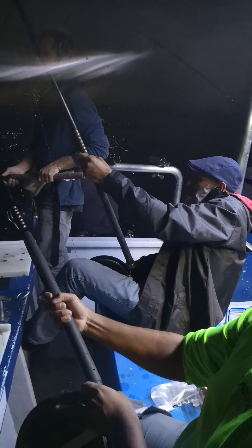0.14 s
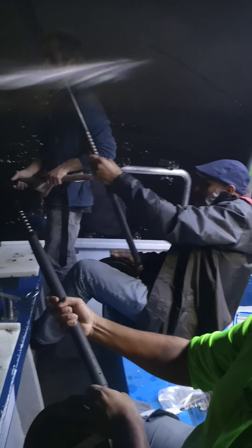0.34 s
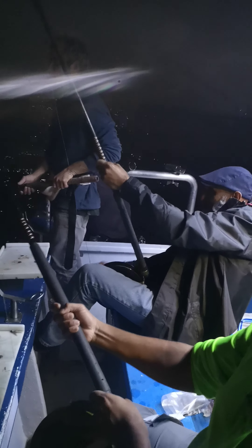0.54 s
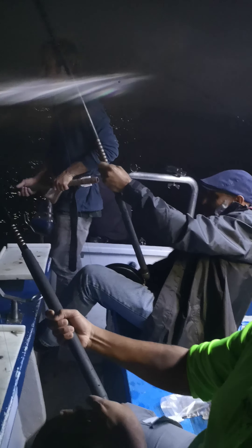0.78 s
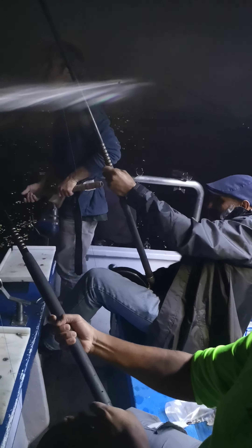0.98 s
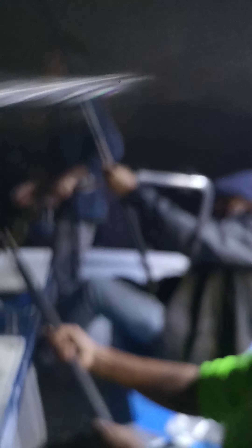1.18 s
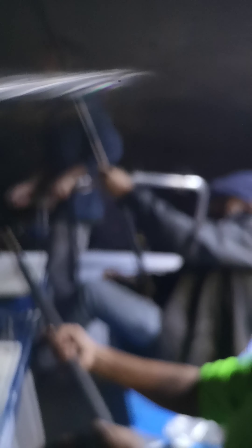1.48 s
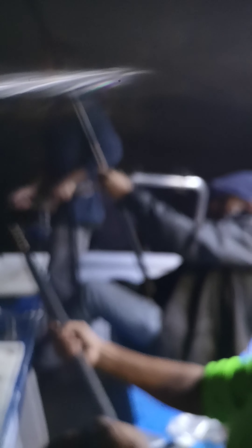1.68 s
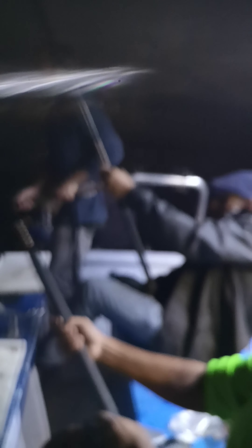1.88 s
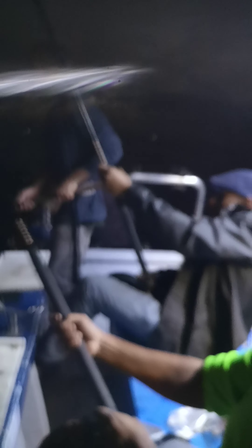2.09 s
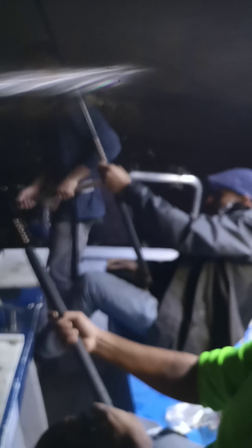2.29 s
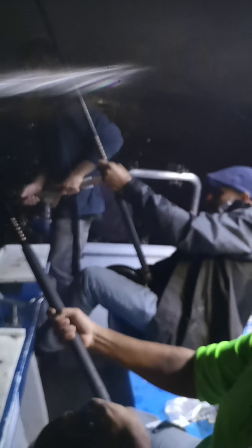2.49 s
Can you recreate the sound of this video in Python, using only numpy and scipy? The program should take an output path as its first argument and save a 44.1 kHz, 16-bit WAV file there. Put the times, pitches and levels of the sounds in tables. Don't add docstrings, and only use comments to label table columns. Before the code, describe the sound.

Wind buffeting a bare microphone in deep uneven thumps on a boat deck, with sharp gear clicks

```python
import sys
import numpy as np
from scipy import signal
from scipy.fft import rfft, irfft, next_fast_len
from scipy.io import wavfile
from scipy.ndimage import uniform_filter1d, minimum_filter1d

SR = 44100
rng = np.random.default_rng(int(sys.argv[2]) if len(sys.argv) > 2 else 0)


def magnitude_from_level(level_db):
    exponent = np.asarray(level_db, float) / 20
    return 10 ** exponent


def inscribe(sig):
    pcm = np.round(np.clip(np.atleast_2d(sig).T, -1, 1) * 32767)
    wavfile.write(sys.argv[1], SR, pcm.astype(np.int16))


N = 116865

# start [t/s], length [t/s], level [level/dB], air speed [scale on eddy pitch]
GUSTS = [(-.03, 0.099, -37.5, 1.33), (.08, 0.076, -36.5, 1.14), (.15, 0.23, -26, 1.146),
         (.31, 0.19, -24, 0.97), (0.378, 0.076, -27, 3.15), (.43, 0.16, -28, 1.16),
         (0.535, 0.234, -29.5, 0.85), (.72, 0.29, -30.5, 0.94), (.87, 0.22, -28, 1.24),
         (.95, 0.15, -24, 1.14), (1.04, 0.13, -26.5, 1.12), (1.185, 0.082, -30, 1.02),
         (1.26, 0.078, -37, 1.19), (1.35, 0.087, -29.5, 1.24), (1.485, 0.052, -37.5, 1.33),
         (1.6, 0.13, -27, 1.17), (1.65, 0.072, -28.5, 1.88), (1.69, 0.08, -33, 1.04),
         (1.755, 0.12, -44, 1.2), (1.876, 0.047, -25, 1.9), (1.922, 0.035, -27.5, 1.2),
         (1.957, 0.15, -45, 2.4), (2.08, 0.098, -38, 0.91), (2.17, 0.33, -50.5, 0.88),
         (2.4, 0.45, -53.5, 1.9), (2.566, 0.15, -34, 0.93), (0.47, 0.064, -32.5, 2.8),
         (0.54, .04, -34, 3.3), (.62, 0.036, -45, 2.9), (.73, 0.031, -41, 2.7), (.84, .06, -43.5, 2.8),
         (1.04, 0.04, -33.5, 2.56), (2.03, 0.049, -42.5, 1.56), (2.2, 0.17, -53.5, 2.35),
         (2.57, 0.055, -46, 2.6)]
# pitch [f/Hz], gain [level/dB]
EDDY_SPECTRUM = [(20, -16), (50, -5.5), (95, 0.5), (150, 1), (240, -11), (400, -23.5), (650, -47.5),
                 (2500, -130)]
# pitch [f/Hz], correlation [0 to 1]
PORT_LIKENESS = [(40, 0.82), (100, 1), (200, 0.91), (400, 0.84)]
PORT_LAG_S, PORT_TILT_DB = .0008, .6
GUST_RISE, GUST_FALL = .35, .4
EDDIES_PER_S, EDDY_SPREAD_DB = 450, 3
EDDY_TOP_HZ, WIND_EDGE_HZ = 280, 760
CREST_POWER = 1.8
GUST_TRIM_DB = -2.5

# time [t/s], level [level/dB]
RUMBLE_LEVEL = [(0.0, -40), (0.5, -30), (0.76, -38.5), (0.99, -34), (1.18, -36.5), (1.65, -44.5),
                (1.74, -54), (1.89, -39), (2.01, -45.5), (2.29, -35.5), (2.61, -56), (2.65, -57)]
# pitch [f/Hz], gain [level/dB]
RUMBLE_SPECTRUM = [(8, 0), (25, -1), (40, -3.5), (60, -7), (120, -16), (300, -31.5), (3000, -130)]

# time [t/s], level [level/dB], extra spray brightness [level/dB]
WASH_SWELL = [(0, -71.5, 11.5), (.1, -59.5, 1.5), (.22, -59.5, 5), (.38, -54, -0.5), (.5, -58, -2.5),
              (.68, -63.5, 5), (.74, -53, -0.5), (.85, -51.5, 0.5), (.98, -54.5, -1), (1.04, -56.5, 0),
              (1.12, -56.5, 4), (1.3, -60, -0.5), (1.44, -53.5, 3.5), (1.56, -64.5, 3.5), (1.95, -59, 5.5),
              (2.1, -55, 5.5), (2.4, -64.5, 9), (2.46, -86, 19)]
# pitch [f/Hz], gain [level/dB]
WASH_SPECTRUM = [(450, -7), (850, -2), (1400, -4.5), (2100, -3), (3300, -11.5), (4300, -13.5),
                 (9000, -16.5), (12500, -35)]
# pitch [f/Hz], gain [level/dB]
SEA_SPECTRUM = [(250, -0.5), (550, -10), (1700, -2), (3300, -5.5), (4200, -17), (9300, -12), (10600, -22),
                (16000, -27.5)]
SEA_DB, SPRAY_HZ = -64.5, 3880

# start [t/s], length [t/s], level [level/dB], centre [f/Hz], left lean [level/dB]
RUSTLES = [(0.086, 0.043, -60, 1910, 2), (0.359, 0.053, -51.5, 2180, -0.5), (2.168, 0.091, -61, 420, -10),
           (0.711, 0.31, -62.5, 1050, -14), (0.854, .02, -51, 650, 2), (.946, 0.039, -55, 1360, -6),
           (0.948, 0.05, -57.5, 2660, 6), (1, 0.048, -49.5, 751, -12.5), (1.064, 0.043, -48.5, 716, -11),
           (1.084, 0.054, -51.5, 1780, 4), (1.404, 0.02, -56, 2560, -8), (1.406, 0.034, -62, 755, -12),
           (1.433, 0.024, -70, 8440, -10), (1.487, 0.043, -67, 3500, -15), (1.687, 0.037, -61.5, 5400, -1),
           (1.875, 0.035, -58.5, 7670, 4.5), (1.926, 0.02, -52, 1620, -7), (1.93, .018, -52.5, 1110, 3),
           (1.969, 0.042, -57, 1060, 6), (1.974, .04, -60, 2520, -15), (1.963, 0.24, -60, 910, -7),
           (2.56, .12, -66.5, 880, -2), (2.045, 0.06, -54.5, 1780, 0), (2.039, 0.03, -55, 2470, -4),
           (2.084, 0.039, -55, 3330, -4), (2.129, 0.057, -52, 2970, -3), (2.13, 0.035, -62.5, 9600, -13),
           (2.11, 0.064, -53, 2200, -3), (2.277, 0.056, -59.5, 2630, -6), (2.324, 0.15, -61.5, 2370, -2),
           (2.401, 0.025, -60.5, 3000, -6), (2.46, 0.013, -65, 3040, -6), (2.37, .04, -66.5, 7500, 0),
           (2.596, 0.06, -61.5, 3220, 0)]
RUSTLE_Q, SNAPS_PER_S = 5.6, 2500
RUSTLE_RISE, RUSTLE_FALL = 0.076, 0.46

# centre [t/s], peak [level/dB], pitch [f/Hz]
THUMPS = [(.109, -27.5, 107), (.186, -20.5, 172), (0.206, -21, 91), (0.248, -17, 107), (0.27, -18.5, 83),
          (0.31, -16.5, 117), (.382, -18.5, 90), (.421, -14.5, 141), (.454, -17.5, 123),
          (0.483, -19.5, 105), (.51, -8, 116.6), (.539, -21, 118), (0.604, -16, 86.4), (0.705, -22.5, 98),
          (.772, -16.5, 102), (.829, -21, 122), (.872, -24.5, 93), (0.909, -20, 127), (0.943, -27, 97),
          (0.992, -24.5, 130), (1.014, -20.5, 101), (1.032, -17, 141), (1.076, -22, 124),
          (1.093, -27.5, 75), (1.131, -17, 155), (1.214, -28, 105), (1.239, -25.5, 129), (1.372, -28, 210),
          (1.412, -23, 94), (1.636, -27, 87), (1.682, -21.5, 174), (1.731, -26.5, 114), (1.898, -14, 171),
          (1.938, -22, 161), (2.635, -27, 127)]
THUMP_TURNS, THUMP_SAG = 0.86, 0.23

# start [t/s], peak [level/dB], left lean [level/dB]
CLICKS = [(0.5161, -35.5, 0.5), (0.5409, -25.5, 5), (0.557, -38, 3.5), (0.611, -38.5, 1), (0.612, -34.5, 0),
          (1.7739, -47, -7), (1.881, -51.5, 12), (2.0325, -37.5, -1), (2.0904, -36.5, 1),
          (2.131, -41, 20.5), (2.1734, -45, -9), (2.4606, -42, -2), (2.529, -42, -1), (2.599, -40.5, 8.5)]
# pitch [f/Hz], gain [level/dB], decay by 60 dB [t/s]
GEAR_MODES = [(847, -10.5, 0.083), (1223, -1, 0.06), (1400, 12.5, 0.012), (1656, -21, 0.14),
              (2287, -4.5, 0.029), (3500, 0.5, 0.02), (5030, -5.5, 0.019), (6900, -25, 0.025),
              (8160, -12, 0.0074)]
# pitch [f/Hz], gain [level/dB]
CRACK_SPECTRUM = [(800, -13.5), (2000, 0), (4000, 1), (8800, 6), (10500, -18.5), (16000, -16)]
CRACK_DB, CRACK_S = -5, .0014
SCATTER_DB, SCATTER_S, SCATTER_HZ = -14, 0.029, 1700
RING_GROWTH = 1.5
RATCHET_S, RATCHET_DB, RATCHET_HZ = .6545, -39.5, 7800
TEETH_PER_S, TEETH = 255, 5

# time [t/s], level [level/dB]
MOAN_LEVEL = [(1.88, -59), (1.96, -51), (2.0, -49), (2.11, -54.5), (2.2, -63), (2.24, -56), (2.32, -76),
              (2.38, -56), (2.45, -71.5), (2.52, -60), (2.61, -57), (2.65, -44)]
MOAN_HZ, MOAN_WIDTH_HZ, MOAN_PAN_DB = 740, 48, -9
MOAN_STEADY = .45

LIMIT_DB = -11.5


def evened(x):
    return x / np.sqrt(np.mean(x ** 2) + 1e-20)


def read(points, hz):
    f, value = np.transpose(points)
    return np.interp(np.log(hz + 1), np.log(f + 1), value)


def level(curve, column=1):
    rows = np.transpose(curve)
    return magnitude_from_level(np.interp(np.arange(N) / SR, rows[0], rows[column]))


def add(mix, s, sound):
    at = round(s * SR)
    part = mix[:, max(at, 0):][:, :sound.shape[1] + min(at, 0)]
    part += sound[:, max(-at, 0):][:, :part.shape[1]]


def coloured(x, gain):
    size = x.shape[-1]
    return irfft(rfft(x) * gain(np.fft.rfftfreq(size, 1 / SR)), size)


def panned(x, db):
    return x * magnitude_from_level([[db / 2], [-db / 2]])


def arch(size, rise, fall):
    u = np.arange(size) / size
    ramp = np.clip(np.minimum(u / rise, (1 - u) / fall), 0, 1)
    return np.sin(np.pi / 2 * ramp) ** 2


def hiss(shape, same, patchy_db, flicker_db, size=512):
    frames, hz = 4 * N // size + 5, np.fft.rfftfreq(size, 1 / SR)
    a, b, c, d, patch = rng.standard_normal((frames, len(hz), 5)).T
    patch = uniform_filter1d(patch, size=7, axis=0)
    patch = evened(uniform_filter1d(patch, size=14, axis=1))
    flicker = evened(uniform_filter1d(rng.standard_normal(frames), size=4))
    left = a + 1j * b
    right = same * left + np.sqrt(1 - same ** 2) * (c + 1j * d)
    gain = magnitude_from_level(read(shape, hz)[:, None] + patchy_db * patch + flicker_db * flicker)
    spectra = np.array([left, right]) * gain
    return signal.istft(spectra, nperseg=size, noverlap=size - size // 4)[1][:, :N]


def in_band(x, lo_hz, hi_hz):
    return x / np.std(coloured(x.mean(0), lambda hz: (hz > lo_hz) & (hz < hi_hz)))


def gust(start, length, db, speed, draws):
    size, pad = round(length * SR), SR // 20
    chance, big, sign = draws[:, :, :size]
    strikes = (chance < EDDIES_PER_S * speed / SR) * np.sign(sign - .5)
    eddies = strikes * magnitude_from_level(-EDDY_SPREAD_DB * np.log(big + 0.033))
    shape = arch(size, GUST_RISE, GUST_FALL)

    def spectrum(power):
        return rfft(np.pad(eddies * shape ** power, ((0, 0), (pad, pad))))

    hz = np.fft.rfftfreq(size + 2 * pad, 1 / SR)
    deep = 1 / (1 + (hz / speed / EDDY_TOP_HZ) ** 4)
    wind = deep * spectrum(.75) + (1 - deep) * spectrum(CREST_POWER)
    left, other = wind * magnitude_from_level(read(EDDY_SPECTRUM, hz / speed)) / (1 + (hz / WIND_EDGE_HZ) ** 8)
    same = np.clip(read(PORT_LIKENESS, hz), 0, 1)
    late = np.exp(-2j * np.pi * hz * PORT_LAG_S)
    right = same * left * late + np.sqrt(1 - same ** 2) * other
    pair = irfft([left, right], size + 2 * pad)
    pair = pair / pair[:, pad:-pad].std()
    return start - pad / SR, magnitude_from_level(db + GUST_TRIM_DB) * panned(pair, PORT_TILT_DB)


def rumble():
    lumps = hiss(RUMBLE_SPECTRUM, 0.99, 3.24, 3.7, size=4096)
    return level(RUMBLE_LEVEL) * in_band(lumps, 25.0, 48.4)


def wash():
    sea = magnitude_from_level(SEA_DB) * in_band(hiss(SEA_SPECTRUM, 0.029, 1.0, 0.87), 1200, SR / 2)
    swell = in_band(hiss(WASH_SPECTRUM, -0.052, 2.6, 2.0), 1335, SR / 2)
    spray = coloured(swell, lambda hz: 1 / (1 + (SPRAY_HZ / (hz + 1)) ** 4))
    brightness = level(WASH_SWELL, column=2) - 1.5
    return sea + level(WASH_SWELL) * (swell + brightness * spray)


def rustle(start, length, db, centre_hz, pan_db, draws):
    size = round(length * SR)
    chance, big, sign = draws[:, :, :size]
    snaps = ((chance < SNAPS_PER_S / SR) + 0.32) * np.log(big + 1e-4) * np.sign(sign - .5)
    ring = coloured(snaps, lambda hz: 1 / (1 + ((hz - centre_hz) * RUSTLE_Q * 2 / centre_hz) ** 2))
    shaped = evened(ring) * arch(size, RUSTLE_RISE, RUSTLE_FALL)
    return start, magnitude_from_level(db + 2.5) * panned(shaped, pan_db)


def thump(s, db, hz, phase):
    t = np.arange(-SR // 20, SR // 20) / SR
    turns = (t - np.array([[0], [PORT_LAG_S]])) * hz
    swing = np.cos(2 * np.pi * (turns - THUMP_SAG * turns ** 2 / 2 + phase))
    return s - 1 / 20, magnitude_from_level(db) * np.exp(-.5 * (turns / THUMP_TURNS) ** 2) * swing


def click(start, db, pan_db, draws):
    t = np.arange(draws.shape[1]) / SR
    crack = evened(coloured(draws, lambda hz: magnitude_from_level(read(CRACK_SPECTRUM, hz))))
    crack = magnitude_from_level(CRACK_DB) * crack * np.exp(-t / CRACK_S)
    ring = 0
    for k, (hz, gain_db, t60) in enumerate(GEAR_MODES):
        phase = draws[:, k:k + 1]
        ring = ring + magnitude_from_level(gain_db - 60 * t / t60) * np.sin(2 * np.pi * hz * t + phase)
    dull = evened(coloured(draws[::-1], lambda hz: 1 / (1 + (hz / SCATTER_HZ - SCATTER_HZ / (hz + 1)) ** 4)))
    scatter = magnitude_from_level(SCATTER_DB) * dull * np.exp(-(t / SCATTER_S) ** 2)
    hardness = magnitude_from_level(RING_GROWTH * (db - max(row[1] for row in CLICKS)))
    onset = np.minimum(t / 0.00071, 1)
    sound = onset * (crack + hardness * (0.53 * ring + scatter))
    return start, magnitude_from_level(db) * panned(sound, pan_db)


def ratchet():
    t = np.arange(SR // 20) / SR
    since = t % (1 / TEETH_PER_S)
    ring = np.sin(2 * np.pi * RATCHET_HZ * since) * np.exp(-since * RATCHET_HZ / TEETH)
    ticks = (t < TEETH / TEETH_PER_S) * ring
    return RATCHET_S, magnitude_from_level(RATCHET_DB) * np.array([ticks, -.4 * ticks])


def moan():
    noise = rng.standard_normal((2, N))
    pair = coloured(noise, lambda hz: 1 / (1 + ((hz - MOAN_HZ) / MOAN_WIDTH_HZ) ** 2))
    envelope = abs(signal.hilbert(pair, next_fast_len(N))[:, :N])
    a, b = pair / envelope ** MOAN_STEADY
    start = np.clip((np.arange(N) / SR - MOAN_LEVEL[0][0]) / 0.042, 0, 1)
    whistle = evened(np.array([a, -.4 * a + 0.94 * b]))
    return level(MOAN_LEVEL) * start * panned(whistle, MOAN_PAN_DB)


def scene():
    mix = rumble() + wash() + moan()
    for row, draws in zip(GUSTS, rng.random((len(GUSTS), 3, 2, SR // 2))):
        add(mix, *gust(*row, draws))
    for row, phase in zip(THUMPS, rng.random(len(THUMPS))):
        add(mix, *thump(*row, phase))
    for row, draws in zip(RUSTLES, rng.random((len(RUSTLES), 3, 2, SR // 3))):
        add(mix, *rustle(*row, draws))
    for row, draws in zip(CLICKS, rng.standard_normal((len(CLICKS), 2, SR // 10))):
        add(mix, *click(*row, draws))
    add(mix, *ratchet())
    return mix


def roll_off(x):
    return signal.sosfilt(signal.butter(12, 15600, fs=SR, output="sos"), x)


def record(dry):
    reach = SR // 100
    peak = -minimum_filter1d(-abs(dry).max(0), size=2 * reach)
    gain = np.minimum(magnitude_from_level(LIMIT_DB) / (peak + 1e-9), 1)
    for _ in range(2):
        gain = uniform_filter1d(gain, size=reach // 2)
    return roll_off(dry * gain)


dry = scene()
out = record(dry)
inscribe(out)
```